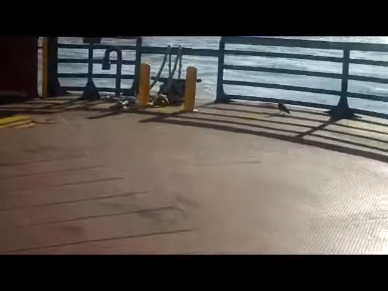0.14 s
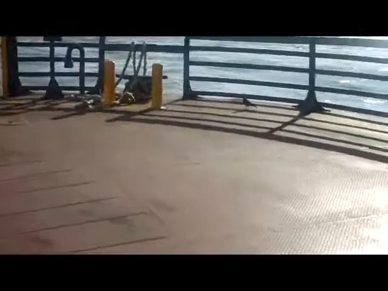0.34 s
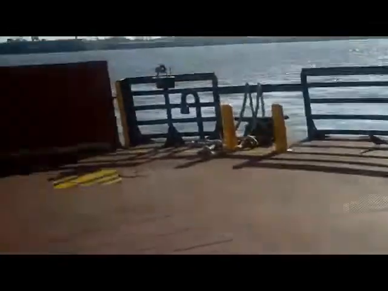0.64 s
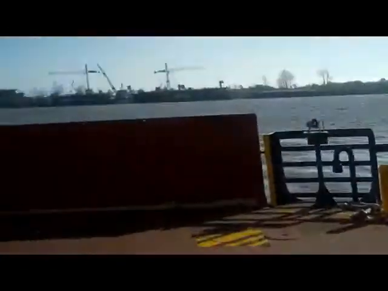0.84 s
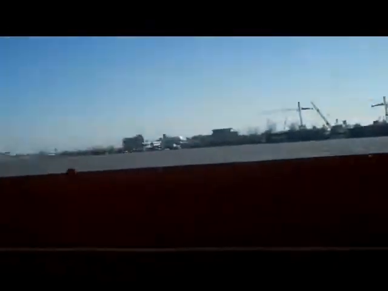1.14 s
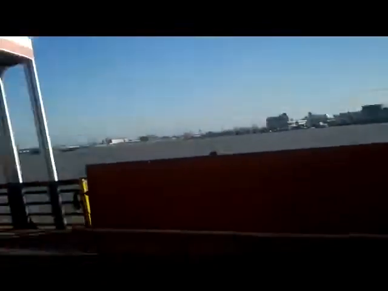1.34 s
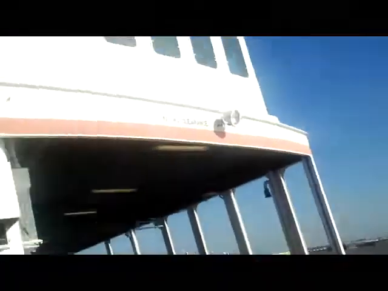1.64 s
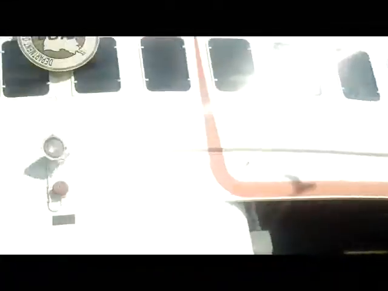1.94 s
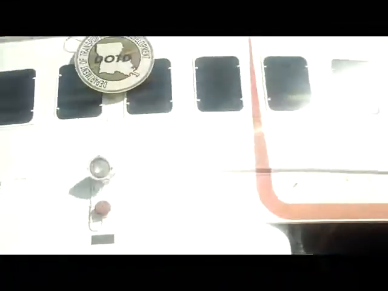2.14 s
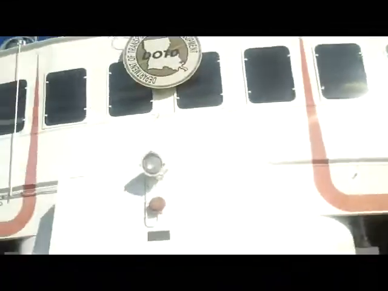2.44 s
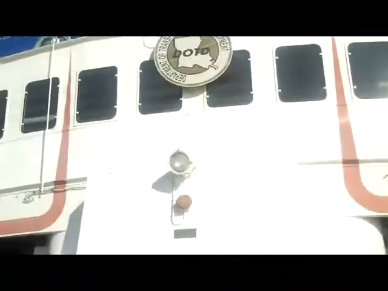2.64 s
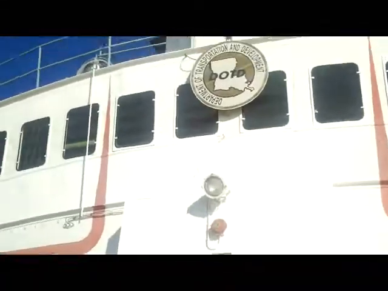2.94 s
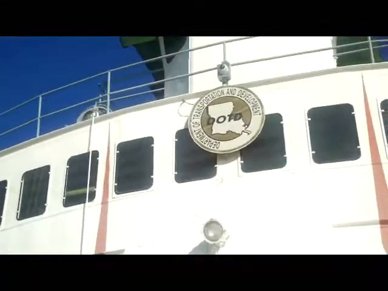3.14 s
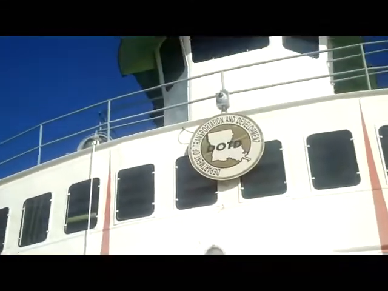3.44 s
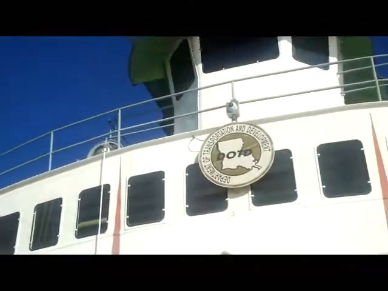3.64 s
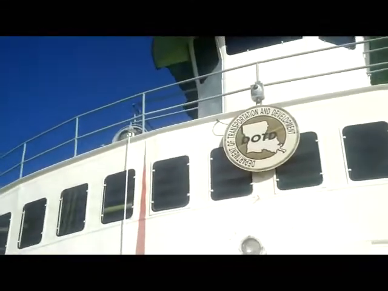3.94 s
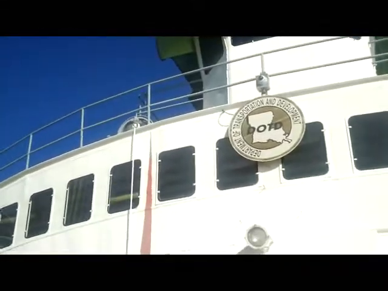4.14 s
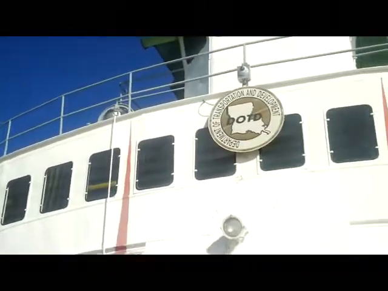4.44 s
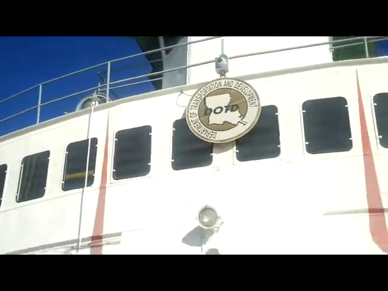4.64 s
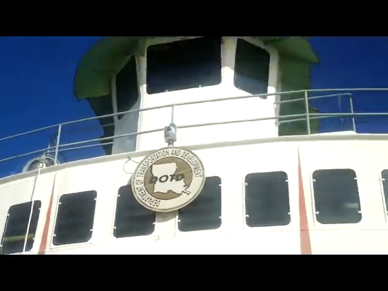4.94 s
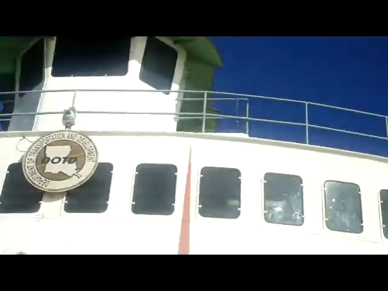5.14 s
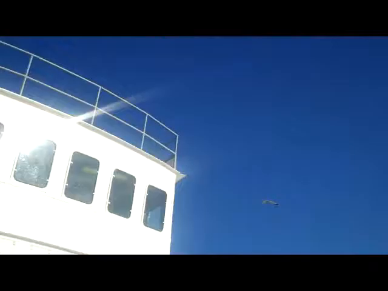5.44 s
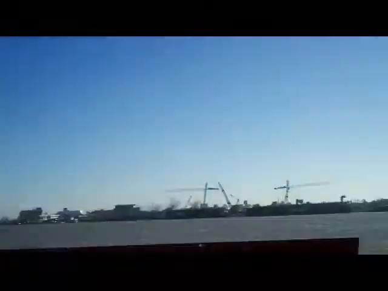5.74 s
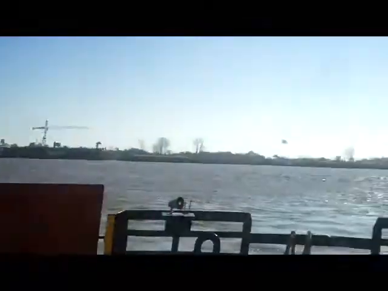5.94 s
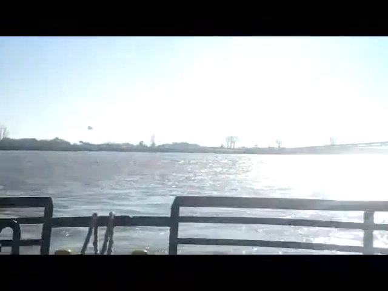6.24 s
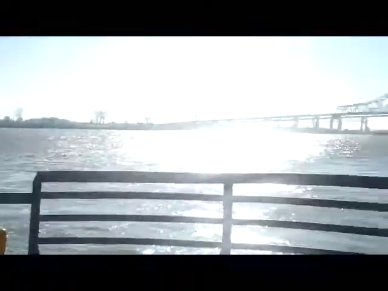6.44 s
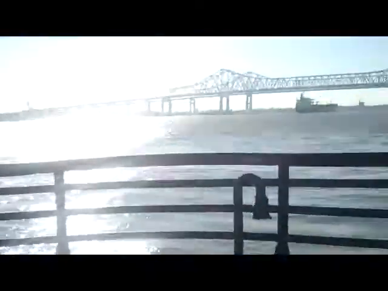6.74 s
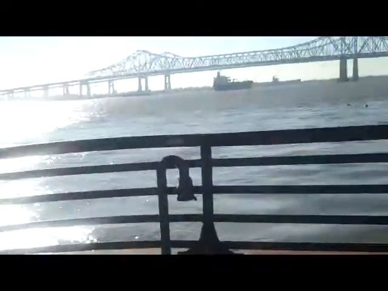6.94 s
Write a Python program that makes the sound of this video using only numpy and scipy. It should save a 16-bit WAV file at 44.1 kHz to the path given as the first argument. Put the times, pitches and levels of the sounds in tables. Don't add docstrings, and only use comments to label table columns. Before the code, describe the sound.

Loud, steady ferry engines throb with a slow beat beneath generator hum and broad machinery roar. Water hisses alongside. A bird whistles close at half a second, then wind slaps the bare microphone, ducking and crackling with overload. Small metal ticks come and go. Slaps are hardest around six seconds; a faint distant bird call follows near the end.

```python
import sys
import numpy as np
from scipy import signal
from scipy.fft import next_fast_len
from scipy.io import wavfile
from scipy.ndimage import uniform_filter1d

SR = 44100
rng = np.random.default_rng(int(sys.argv[2]) if len(sys.argv) > 2 else 0)


def generate_wav(signal):
    frames = np.transpose(np.atleast_2d(signal))
    scaled = np.clip(frames, -1, 1) * 32767
    pcm = np.round(scaled).astype(np.int16)
    wavfile.write(sys.argv[1], SR, pcm)


def voltage_ratio(level):
    return 10 ** (np.asarray(level, float) / 20)


N = 312669

# t/s, level/dB
FACING = [(0.0, -0.85), (.41, -0.65), (.63, -0.9), (1.01, -0.6), (1.66, 0.4), (1.99, .5), (2.35, 0.3),
          (2.6, 0.25), (3.24, 0.04), (3.71, 0.4), (3.87, -0.2), (4.42, 0.27), (5.47, 0.2), (6.08, -0.35),
          (6.54, -2), (7.09, -2.5)]


def evened(x):
    return x / np.sqrt(np.mean(x ** 2) + 1e-20)


def add(mix, s, sound):
    part = mix[round(s * SR):][:len(sound)]
    part += sound[:len(part)]


def smooth(x, seconds):
    r = np.exp(-1 / (seconds * SR))
    return signal.lfilter([1 - r], [1, -r], x)


def along(rows, share=1):
    s, level_db = np.transpose(rows)
    return voltage_ratio(share * np.interp(np.arange(N) / SR, s, level_db))


def swells(rows, width_s):
    t = np.arange(N) / SR
    return voltage_ratio(sum(db * np.exp(-((t - s) / width_s) ** 2 / 2) for s, db in rows))


def noise(colour, size, patchy_db, flicker_db):
    frames = 4 * N // size + 5
    hz = np.fft.rfftfreq(size, 1 / SR)
    a, b, patches = rng.standard_normal((frames, len(hz), 3)).T
    patches = uniform_filter1d(patches, size=9, axis=0)
    patches = evened(uniform_filter1d(patches, size=7, axis=1))
    flicker = evened(uniform_filter1d(rng.standard_normal(frames), size=3))
    f, colour_db = np.transpose(colour)
    shape_db = np.interp(np.log(hz + 1), np.log(f + 1), colour_db, -120, -120)[:, None]
    z = (a + 1j * b) * voltage_ratio(shape_db + patchy_db * patches + flicker_db * flicker)
    return evened(signal.istft(z, nperseg=size, noverlap=3 * size // 4)[1][:N])


def fuzzy_tone(hz, width_hz):
    steps = int(N / SR * width_hz * 2) + 2
    drift = rng.standard_normal(steps) + 1j * rng.standard_normal(steps)
    drift = signal.resample(drift, next_fast_len(N))[:N]
    carrier = np.exp(2j * np.pi * hz * np.arange(N) / SR)
    return evened((drift * carrier).real)


def wind():
    # f/Hz, level/dB per Hz
    buffet = [(5, -30.), (10, -2), (22, -2), (40, -7.5), (55, -8), (80, -1.5), (115, -4), (150, -16),
              (200, -39.5)]
    # t/s, level/dB
    breeze = [(0.0, -1.5), (.35, 1.5), (.5, -1.4), (1.2, 0.4), (1.6, -4), (2.3, -3), (2.9, -1), (3.6, -2.8),
              (3.9, 2.9), (4.7, 0.5), (5.2, 0.3), (5.5, 1), (6.0, 3), (6.6, 0.8), (7.09, -0.2)]
    # t/s, level/dB up or down
    gusts = [(.37, 3), (1.33, -10), (1.42, 3.5), (1.72, 8), (1.82, -10), (1.95, 10), (2.07, -1.5),
             (2.49, 2.5), (2.65, -2.2), (2.78, 5), (3.73, 2.5), (4.05, -6.5), (4.38, -1), (4.64, -2),
             (5.27, 4.5), (5.32, -2.5), (5.38, 4), (6.12, -9.5), (6.28, 3.5), (6.45, -1), (6.5, 3),
             (6.94, 4.5)]
    gusting = voltage_ratio(-11) * along(breeze) * swells(gusts, width_s=0.045)
    return gusting * noise(buffet, size=4096, patchy_db=0.75, flicker_db=1.04)


def slaps(width_s=0.0021, strength=1.02):
    # t/s, signed pressure/full scale
    slap_rows = [(0.5956, -1), (0.776, -2.44), (0.957, -0.7), (1.1252, 1.4), (1.291, -1.2), (1.4746, -1.2),
                 (1.505, -1.5), (1.674, 1.3), (2.1851, 2), (2.3512, -1.7), (3.474, 1), (3.8703, 0.7),
                 (3.9614, 1.5), (4.1125, 1.5), (4.3583, 2.1), (4.5516, -0.2), (4.5975, 1.3), (4.6313, 2),
                 (5.1852, -1), (5.3186, 0.9), (5.6275, 1), (5.788, -3.5), (5.8553, 1.5), (6.078, 1.5),
                 (6.2213, 3), (6.2648, -3), (6.3598, -3), (6.4625, 3), (6.7004, 1.5), (6.915, 0)]
    out = np.zeros(N)
    u = np.arange(-600, 600) / SR / width_s
    push = np.exp(-u ** 2 / 2) - 0.28 * np.exp(-u ** 2 / 18)
    for s, pressure in slap_rows:
        add(out, s - 600 / SR, strength * pressure * push)
    return out


def engines():
    firing_hz = [18.79, 32.83, 33.15, 34.91, 69.5, 69.85, 104.8]
    firing_db = [-30, -14, -13.5, -18.5, -23, -22., -25.5]
    # t/s, level/dB
    firing_level = [(0, -1.5), (.7, -2.5), (1.6, 1.2), (2.6, -0.5), (3.2, 1), (4.1, 0.55), (5.7, -1.4),
                    (6.3, 1.9), (7.09, 1.7)]
    in_step_s = 1.7008
    t = np.arange(N) / SR - in_step_s
    tones = sum(voltage_ratio(db) * np.cos(2 * np.pi * hz * t) for hz, db in zip(firing_hz, firing_db))
    return along(firing_level) * np.sqrt(2) * tones


def roar():
    # f/Hz, level/dB per Hz
    roar_colour = [(120, -17), (200, -1), (290, -7), (391, -9), (468, -8.5), (602, -12.5), (1070, -11),
                   (1650, -22), (3500, -43), (4550, -80), (7700, -120)]
    return voltage_ratio(-20.5) * along(FACING) * noise(roar_colour, size=1024, patchy_db=0.79, flicker_db=0.14)


def deck():
    # f/Hz, level/dB per Hz
    drumming = [(90, -33), (125, -3.5), (160, -2), (230, -5.5), (330, -10.), (450, -35.5)]
    # t/s, level/dB up or down
    booms = [(.05, 1), (1.29, -0.5), (1.36, 8), (1.57, 2), (1.72, -3.5), (1.95, 0), (2.09, 5), (2.4, 4),
             (2.72, -2), (2.87, 6), (3.84, 7), (4.0, -6.5), (4.16, 5), (4.36, 9), (4.44, 0), (4.52, 6),
             (4.66, 9), (5.25, 4.5), (5.97, -8), (6.11, 10), (6.21, 4.5), (6.44, 4), (6.51, -19),
             (6.95, -4)]
    booming = voltage_ratio(-21.5) * swells(booms, width_s=0.036)
    return booming * noise(drumming, size=4096, patchy_db=1.07, flicker_db=-0.1)


def generator():
    orders_db = {4: -29.5, 5: -22, 6: -23.5, 8: -35, 10: -40, 12: -33., 16: -42}
    shaft_hz = 22.655
    turns = shaft_hz * np.arange(N) / SR
    hum = sum(voltage_ratio(db) * np.cos(2 * np.pi * (k * turns + rng.random())) for k, db in orders_db.items())
    return np.sqrt(2) * hum


def water():
    # f/Hz, level/dB per Hz
    wash = [(1290, -3.5), (2200, -0.5), (2800, -6.5), (3750, -7.5), (5950, -17.5), (7640, -20.5),
            (12100, -28.5), (13800, -34), (15200, -60)]
    return voltage_ratio(-38) * along(FACING, share=2.7) * noise(wash, size=512, patchy_db=0.84, flicker_db=0.5)


def whines():
    whine_hz = [466, 478, 926, 1087, 3700]
    # width/Hz, level/dB rms
    wavering = [(6., -35.5), (5., -40.5), (9., -44), (9., -41.5), (7.5, -63.5)]
    # t/s, level/dB
    whistle_rows = [
        (1.6, -85.),
        (1.85, -69.),
        (3.2, -73),
        (4.3, -76),
        (5.5, -76),
        (5.8, -96),
    ]
    whistle = along(whistle_rows) * fuzzy_tone(12095, width_hz=25.)
    return whistle + sum(voltage_ratio(db) * fuzzy_tone(hz, width_hz) for hz, (width_hz, db) in zip(whine_hz, wavering))


def whistled(rows, call_db, octave_db):
    s, hz, level_db = rows
    t = np.arange(0, min(s[-1], .2), 1 / SR)
    turn = 2 * np.pi * np.cumsum(uniform_filter1d(np.interp(t, s, hz), size=600)) / SR
    note = np.sin(turn) + voltage_ratio(octave_db) * np.sin(2 * turn)
    note *= signal.windows.tukey(len(t), .06)
    return np.sqrt(2) * voltage_ratio(call_db + np.interp(t, s, level_db)) * note


def bird():
    # low note t/s, swoop t/s, swoop slowness/ratio, swoop pitch/ratio, level/dB rms
    calls = [
        (.515, .578, 1., 1., -39.5),
        (6.667, 6.742, 1.8, 1.026, -59.5),
    ]
    # t/s after its start, f/Hz, level/dB
    low_note = [
        (0, 5085, -8),
        (.008, 5098, -4),
        (.03, 5095, -2),
        (.052, 5066, 0),
        (.063, 5060, -5),
    ]
    # t/s after its start, f/Hz, level/dB
    swoop = [
        (0, 6075, -6),
        (.012, 6000, -2),
        (.05, 5735, -2),
        (.095, 5682, -7),
        (.144, 5737, -6),
        (.177, 5840, -7),
        (.199, 5690, -12),
    ]
    out = np.zeros(N)
    for low_s, swoop_s, slowness, factor, call_db in calls:
        add(out, low_s, whistled(np.transpose(low_note), call_db, octave_db=-17.0))
        bent_swoop = np.transpose(swoop) * [[slowness], [factor], [1]]
        add(out, swoop_s, whistled(bent_swoop, call_db, octave_db=-60.))
    echo_s, echo_db = .045, -12.
    add(out, echo_s, voltage_ratio(echo_db) * out[:-SR // 10])
    return out


def ticks():
    # t/s, peak level/dB, lowest mode f/Hz, highest mode f/Hz, t60/s; the one at 0.7763 s is a spit of overload
    tick_rows = [(.0932, -41, 7000, 9000, .008), (.368, -42, 8000, 10000, .008), (.6467, -41, 7200, 9600, .008),
                 (.7763, -33, 7200, 10200, .012), (1.7107, -33, 8500, 11000, .008),
                 (2.4048, -27, 3100, 3600, .025), (2.4047, -24, 3950, 5050, .016),
                 (3.0823, -34, 5200, 7800, .008), (3.0941, -23, 2950, 3900, .018),
                 (3.0943, -37, 6900, 8000, .012), (3.6518, -33, 5500, 9000, .008),
                 (4.6312, -34, 8000, 14000, .008), (4.712, -30, 2000, 4000, .06), (4.728, -30, 2000, 4000, .06),
                 (4.8128, -40, 6000, 12500, .008), (4.8191, -27.5, 5000, 13000, .012),
                 (4.8355, -42, 5500, 12500, .008), (5.4864, -32, 7000, 9500, .01),
                 (5.997, -24, 3900, 5000, .015), (5.9971, -27, 3050, 3600, .025)]
    tap_s = .0007
    out = np.zeros(N)
    t = np.arange(2400) / SR
    for s, peak_db, low_hz, high_hz, t60 in tick_rows:
        hz = np.geomspace(low_hz, high_hz, num=12)[:, None]
        starts = rng.random((12, 1))
        turns = hz * (t - tap_s) + .5 * starts
        decay = voltage_ratio(-60 * t * np.sqrt(hz / low_hz) / t60)
        ring = (np.sin(2 * np.pi * turns) * decay).sum(0)
        ring *= np.minimum(t / tap_s, 1)
        spread_db = 4.5 + 3 * np.log2(high_hz / low_hz)
        add(out, s, voltage_ratio(peak_db + spread_db) * ring / abs(ring).max())
    return out


def scene():
    mono = wind() + slaps() + engines() + roar() + deck()
    mono += generator() + water() + whines() + bird() + ticks()
    mono *= np.minimum(np.arange(N)[::-1] / 120, 1)
    return np.array([mono, mono])


def limiter(hot, excess):
    push_db = (excess > 0) * 27.5 + 11.3 * excess
    duck_db = smooth(smooth(push_db, 0.002), 0.0039)
    duck_db = 12.15 * np.tanh(duck_db / 13.0)
    return np.clip(hot * voltage_ratio(-duck_db), -1, 1)


def grit_bursts(excess):
    # f/Hz, level/dB per Hz
    grit_colour = [(880, -36), (1500, -3.5), (4800, -16), (8580, -18), (12300, -25.5), (14100, -24),
                   (15200, -30)]
    over = excess > 0
    spit = np.tanh(smooth(np.diff(over, prepend=False) * 1., 0.00036) * 43.0)
    haze = np.tanh(smooth(over.max(0) * 1., 0.029) * 12.0)
    grit = np.array([noise(grit_colour, size=512, patchy_db=1.5, flicker_db=-3.5) for _ in excess])
    return grit * (voltage_ratio(-47.5) * haze + voltage_ratio(-37.5) * spit)


def thin_out(pair, jitter_db=4.5):
    # f/Hz, level/dB
    survival = [(1000, -36), (4000, -10.5), (9000, -10), (12500, -11), (13800, 0), (14800, 9.),
                (15500, 20.)]
    sum_and_difference = [pair[0] + pair[1], pair[0] - pair[1]]
    hz, _, z = signal.stft(sum_and_difference, SR, "cosine", nperseg=2048, boundary="even")
    local_db = uniform_filter1d(20 * np.log10(abs(z[0]) + 1e-9), size=60, axis=0)
    local_db = uniform_filter1d(local_db, size=9, axis=1)
    luck = rng.standard_normal((z.shape[2] // 3 + 1, 43, 2)).T
    blocks = np.kron(luck, np.ones((24, 3)))[:, :len(hz), :z.shape[2]]
    f, survival_db = np.transpose(survival)
    margin_db = np.interp(hz, f, survival_db, -90, 90)[:, None]
    limit = voltage_ratio(local_db + margin_db + jitter_db * blocks)
    total, difference = signal.istft(z * (abs(z) > limit), SR, "cosine", nperseg=2048)[1][:, :N]
    return np.array([total + difference, total - difference]) / 2


def roll_off(x):
    return signal.sosfilt(signal.butter(12, 15610, fs=SR, output="sos"), x)


def record(dry):
    offset = .224
    hot = dry + np.array([[offset], [-offset]])
    excess = np.maximum(abs(hot) - 1, 0)
    out = limiter(hot, excess) + grit_bursts(excess)
    mix = np.clip(thin_out(out), -1, 1)
    return roll_off(mix)


dry = scene()
out = record(dry)
generate_wav(out)
```